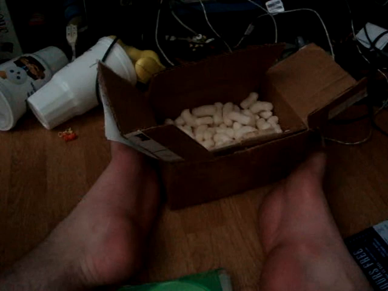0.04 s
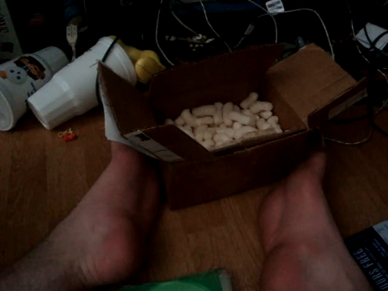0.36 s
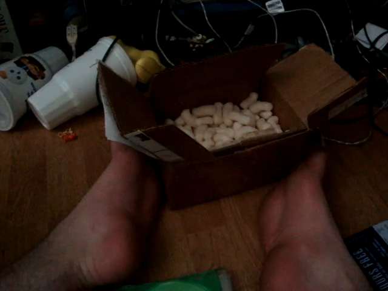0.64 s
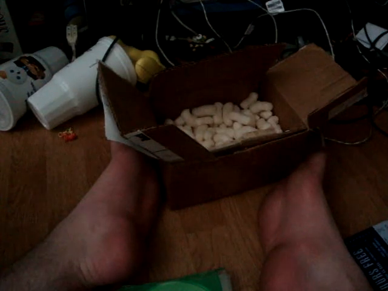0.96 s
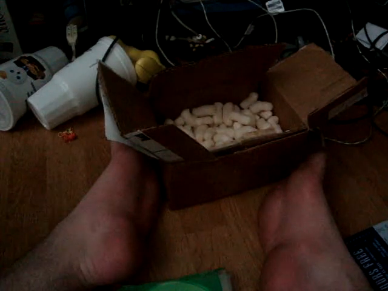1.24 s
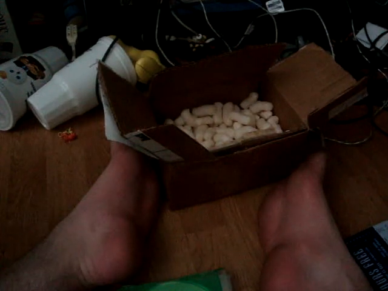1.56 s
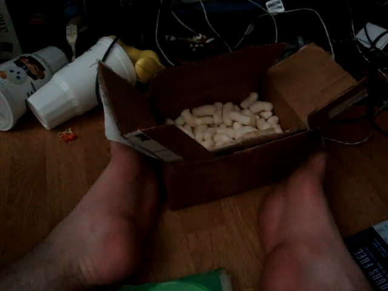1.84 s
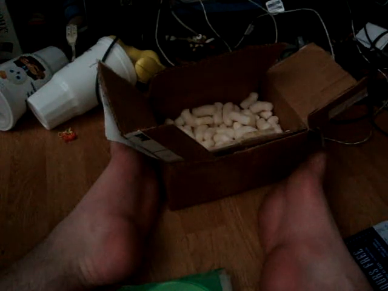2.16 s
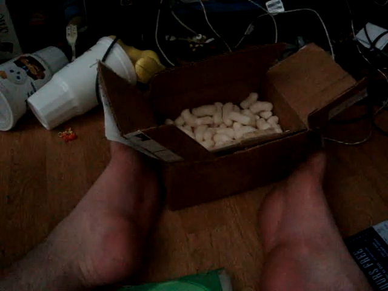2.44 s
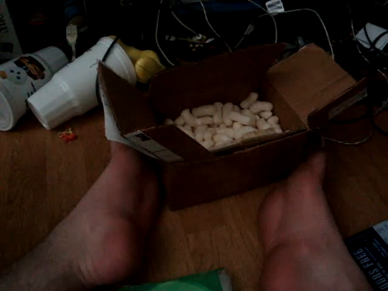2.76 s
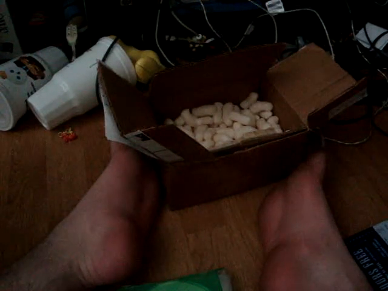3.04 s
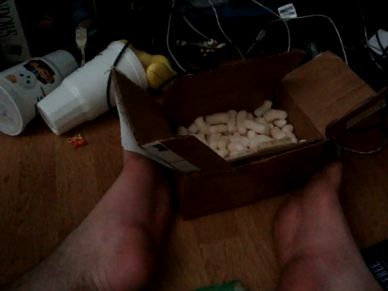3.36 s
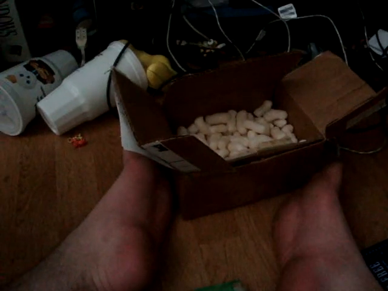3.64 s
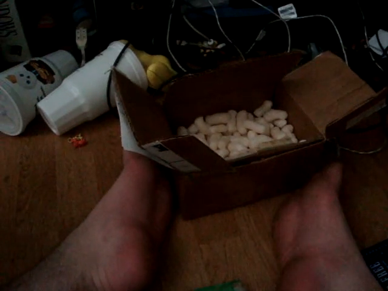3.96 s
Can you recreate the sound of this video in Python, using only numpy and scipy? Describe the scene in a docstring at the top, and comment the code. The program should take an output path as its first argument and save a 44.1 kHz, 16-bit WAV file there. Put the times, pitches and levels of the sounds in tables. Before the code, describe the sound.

Close, dry crackles and clicks come from a cardboard box being pressed in a small, quiet room. A short lull follows, then a sharp, stuttering shove over the floor and a dull tap, above soft hiss and hum.

```python
"""Two bare feet squeeze an open cardboard box of foam peanuts on a wooden floor in a small, quiet room.
Soft hiss, a faint drone and mains hum run throughout. The board opens with dull taps and a snap, then
crackles for 2 s in bursts of tiny clicks that ring its panels. At 2.8 s it crackles and snaps again.
At 3.1 s the box is shoved and judders over the floor with sharp snaps; a dull tap follows.
A last faint crackle and ringing tick come at 3.8 s."""
import sys
import numpy as np
from scipy import signal
from scipy.fft import rfft, irfft
from scipy.io import wavfile
from scipy.ndimage import uniform_filter1d

SR = 44100
rng = np.random.default_rng(int(sys.argv[2]) if len(sys.argv) > 2 else 0)


def transcribe(signal):
    """Save signal, clipped to [-1, 1], as a 16-bit WAV file at the path in sys.argv[1]."""
    frames = np.atleast_2d(signal).T
    limited = np.clip(frames, -1, 1)
    pcm = np.round(limited * 32767).astype(np.int16)
    wavfile.write(sys.argv[1], SR, pcm)


N = 176400

# hiss spectrum: f/Hz, gain/dB
HISS_SPECTRUM = [(25, -27), (55, -13.5), (100, -21), (160, -13.5), (230, -8.5), (380, -4), (560, -5.5),
                 (1050, -6), (1640, -9), (2600, -8), (3200, -12.5), (5600, -15.5), (10000, -21)]
# hiss envelope: t/s, level/dB
HISS_ENVELOPE = [(0, -53.5), (.25, -55), (.7, -56), (.95, -55), (1.2, -51.5), (1.45, -54.5), (1.8, -55),
                 (2.1, -52.5), (2.6, -54), (3, -55.5), (3.4, -51), (4, -54.5)]
# room drone bands: f/Hz, width/Hz, level/dB
DRONE_BANDS = [(380.3, 17, -69.5), (434.3, 24, -68.5), (1035, 14, -69.5), (2060, 100, -69)]
# dull panel taps: t/s, peak/dB, f/Hz, width/Hz
PANEL_TAPS = [(.0346, -18.5, 1355, 620), (.038, -25.5, 1170, 900), (.082, -32.5, 980, 1200),
              (3.266, -28, 1060, 600)]
# crackles of the squeezed board: t/s, level/dB, decay/ms, tilt/(dB/oct), patch f/Hz, patch gain/dB
BOARD_CRACKLES = [(.0440, -25, 13, 3, 1300, -6), (.4695, -38, 4.7, 3, 4800, -12),
                  (.533, -43, 3, -3, 3000, -7), (.5578, -21, 4.5, 2, 4600, 4),
                  (.592, -26.5, 1.7, 0, 4500, -3), (.610, -28.5, 11, 2.5, 3600, 6),
                  (.6225, -28.5, 6.7, 0.5, 1270, 8), (.727, -46.5, 2.7, -2, 3000, -6),
                  (.875, -33, 6.1, 2, 3170, 13), (.885, -36.5, 8.1, 1, 3020, 1),
                  (.940, -43.5, 3, -2.5, 1200, 0), (.9615, -41, 2.7, 1.5, 4800, 14),
                  (.975, -49, 8.9, -2, 2000, 16), (.997, -42, 6, 2, 2100, 3),
                  (1.056, -27.5, 3.6, 3, 830, 5), (1.0905, -22.5, 11.7, 1.5, 4800, 1),
                  (1.103, -24.5, 7.2, 0.5, 1680, 6), (1.117, -33.5, 13, -0.5, 1410, 4),
                  (1.431, -46.5, 5.1, -4.5, 1500, -1), (1.5195, -28, 2, 1.5, 4630, 0),
                  (1.5395, -34.5, 5.3, 3, 4500, 1), (1.5555, -39, 3.7, -11, 856, 0),
                  (1.574, -37.5, 6.1, -10, 400, -4), (1.583, -22.5, 6.3, 1, 1240, -2),
                  (1.590, -25.5, 8.7, 0.7, 810, -3), (1.896, -39, 4, -0.5, 3350, 1),
                  (2.8275, -21.5, 8.6, -0.5, 696, 7), (2.849, -35.5, 19.5, -2, 1370, -16),
                  (3.832, -44.5, 9.7, -2.5, 2620, 11)]
# crackle spectrum: f/Hz, gain/dB
CRACKLE_SPECTRUM = [(40, -28), (150, -18), (300, -9), (600, -4.5), (1100, 0), (2200, 0), (4500, -1),
                    (7000, -2.5), (10000, -5.5)]
# box resonances: f/Hz, width/Hz, gain/dB
PANEL_MODES = [(257, 50, 0.5), (403, 22, 4), (610, 22, -5), (840, 24, 9), (943, 25, 0), (1184, 38, 1.5),
               (1333, 78, 8), (1704, 24, -3.5), (2420, 97, -3.5), (2804, 93, -5), (3220, 31, -2),
               (4220, 70, -5), (5520, 120, -3)]
# sharp board snaps: t/s, peak/dB, f/Hz, width/Hz
BOARD_SNAPS = [(.0445, -10.5, 380, 4430), (2.8296, -24, 1500, 3000), (3.0724, -2, 3000, 5000),
               (3.1169, -4.5, 2000, 1800), (3.1325, -5, 2200, 3500), (3.1602, -12.5, 2500, 4000),
               (3.1814, -13, 2800, 3500)]
# slips of the box on the floor: t/s, level/dB, decay/ms, tilt/(dB/oct)
FLOOR_SLIPS = [(3.060, -23.5, 11, -0.5), (3.0665, -17.5, 5.3, -1.5), (3.077, -22.5, 1.6, -3),
               (3.085, -36.5, 22, 4), (3.100, -19, 6, 9.5), (3.1065, -18.5, 4.3, -0.5),
               (3.114, -17.5, 2.4, 0.5), (3.123, -29, 3.6, -3), (3.130, -19, 5.5, -1),
               (3.141, -21.5, 5.2, -4.5), (3.1535, -14, 3.4, 3.5), (3.160, -11, 7.4, 1),
               (3.172, -14, 3.6, 1.5), (3.179, -16.5, 3.2, -1), (3.187, -17, 2.7, 2),
               (3.194, -18.5, 3.4, -1.5), (3.224, -38, 5.9, -2.5)]
# slip spectrum: f/Hz, gain/dB
SLIP_SPECTRUM = [(30, -28), (110, -8), (200, -11), (270, -7), (600, -1), (950, 0.5), (1350, 0), (2200, -3),
                 (4500, -8), (7000, -12.5), (10000, -23)]
# faint ringing tick: t/s, peak/dB, f/Hz, width/Hz
RINGING_TICK = [(3.833, -47.5, 2620, 23)]
# room tail spectrum: f/Hz, gain/dB
ROOM_SPECTRUM = [(60, 9), (300, 9), (1500, 8.5), (4000, 11), (10000, -30)]

GRAINS_PER_S, TILT_PIVOT_HZ, PATCH_Q = 16000, 2500, 9.7
TOP_HZ = 10100


def undb(db):
    """dB to gain."""
    return 10 ** (np.asarray(db) / 20)


def freqs(size):
    """FFT bin frequencies in Hz, floored at 1."""
    return np.maximum(np.arange(size // 2 + 1) * SR / size, 1)


def colour(spectrum, f):
    """Gain of a spectrum table, interpolated over log f."""
    hz, db = np.array(spectrum, float).T
    return undb(np.interp(np.log(f), np.log(hz), db))


def resonance(f, hz, width_hz):
    """One damped mode, 1 at its centre."""
    return 1 / (1 + 1j * (f * f - hz * hz) / (f * width_hz))


def noise(response):
    """Shaped noise, rms 1."""
    x = irfft(rfft(rng.standard_normal(N)) * response, N)
    return x / np.sqrt(np.mean(x ** 2))


def add(out, start_s, sound):
    """Mix a sound in at start_s."""
    i = max(int(start_s * SR), 0)
    out[i:i + len(sound)] += sound[:max(N - i, 0)]


def background(hum_hz=120, hum_db=-72):
    """Slowly swelling hiss, narrow-band drone, mains hum."""
    t, f = np.arange(N) / SR, freqs(N)
    hiss_db = np.interp(t, *np.array(HISS_ENVELOPE).T)
    hiss = undb(hiss_db) * noise(colour(HISS_SPECTRUM, f))
    drone = sum(undb(db) * noise(resonance(f, hz, width) ** 2) for hz, width, db in DRONE_BANDS)
    hum = undb(hum_db) * np.sqrt(2) * np.sin(2 * np.pi * hum_hz * t)
    return hiss + drone + hum


def knocks(rows, order, size=16384):
    """Single blows, each into one damped mode; higher order, softer contact."""
    out, f = np.zeros(N), freqs(size)
    blow = rfft(signal.unit_impulse(size, 8)) / (1 + 1j * f / TOP_HZ)
    for start_s, peak_db, hz, width_hz in rows:
        ring = irfft(blow * resonance(f, hz, width_hz) ** order)
        add(out, start_s, -undb(peak_db) * ring / np.abs(ring).max())
    return out


def click_bursts(rows, spectrum, rise_ms, spread_db, ring_gain, size=16384):
    """Showers of tiny clicks swell, decay and ring the box, plus one patch of board if listed."""
    out, f = np.zeros(N), freqs(size)
    lead = size // 16
    from_peak_ms = (np.arange(size) - lead) * 1000 / SR - rise_ms
    swell_ms = rise_ms / 2
    modes = sum(undb(db) * resonance(f, hz, width) for hz, width, db in PANEL_MODES)
    body = colour(spectrum, f) * (1 + ring_gain * modes)
    for start_s, level_db, decay_ms, tilt_db_per_oct, *patch in rows:
        envelope = np.exp(np.minimum(from_peak_ms / swell_ms, -from_peak_ms / decay_ms))
        polarity, strength = rng.standard_normal((2, size))
        fires = rng.random(size) < GRAINS_PER_S / SR
        grains = fires * np.sign(polarity) * undb(spread_db * strength)
        response = body * undb(tilt_db_per_oct * np.log2(np.maximum(f, 500) / TILT_PIVOT_HZ))
        if patch:
            patch_hz, patch_db = patch
            response *= 1 + undb(patch_db) * resonance(f, patch_hz, patch_hz / PATCH_Q)
        burst = irfft(rfft(grains * envelope) * response)
        burst *= np.linalg.norm(envelope) / np.linalg.norm(burst)
        add(out, start_s - lead / SR, undb(level_db) * burst)
    return out


def board_crackle():
    """Squeezed board crackles and rings its panels strongly."""
    return click_bursts(BOARD_CRACKLES, CRACKLE_SPECTRUM, rise_ms=1.64, spread_db=3.5, ring_gain=0.93)


def floor_judder():
    """The shoved box moves in quick slips that ring it weakly."""
    return click_bursts(FLOOR_SLIPS, SLIP_SPECTRUM, rise_ms=2.6, spread_db=3, ring_gain=0.32)


def room(x, wet_db, t60_s=0.15, gap_s=0.0044):
    """Direct sound plus the short tail of a furnished room."""
    t = np.arange(SR // 2) / SR
    envelope = np.exp(-np.log(1000) * t / t60_s) * (t > gap_s)
    tail = rng.standard_normal(len(t)) * envelope
    tail = irfft(rfft(tail) * colour(ROOM_SPECTRUM, freqs(len(t))), len(t))
    return x + undb(wet_db) * signal.fftconvolve(x, tail / np.linalg.norm(tail))[:N]


def scene():
    """Box sounds in the room, over the background; mono."""
    taps = knocks(PANEL_TAPS, order=2)
    crackle = board_crackle()
    snaps = knocks(BOARD_SNAPS, order=1)
    judder = floor_judder()
    tick = knocks(RINGING_TICK, order=1)
    box = room(crackle, wet_db=-17.5) + room(judder, wet_db=-33) + room(taps + snaps + tick, wet_db=-16)
    return (box + background())[None]


def record(dry, knee_db=-24, cut_db_per_db=0.47, sense_s=0.015, release_db_per_s=1.645):
    """Gain control ducks on loud sounds and recovers slowly; steep low-pass."""
    power = np.abs(uniform_filter1d(dry[0] ** 2, int(sense_s * SR)))
    over_db = np.maximum(10 * np.log10(power + 1e-12) - knee_db, 0)
    release_db = release_db_per_s * np.arange(N) / SR
    cut_db = np.maximum.accumulate(cut_db_per_db * over_db + release_db) - release_db
    lowpass = signal.ellip(10, rp=0.2, rs=65, Wn=TOP_HZ, fs=SR, output="sos")
    return signal.sosfilt(lowpass, dry * undb(-cut_db))


dry = scene()
out = record(dry)
transcribe(out)
```